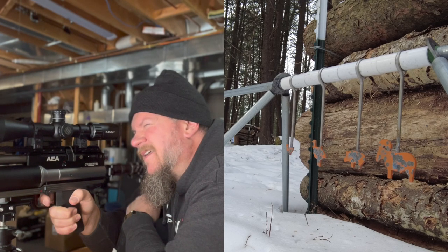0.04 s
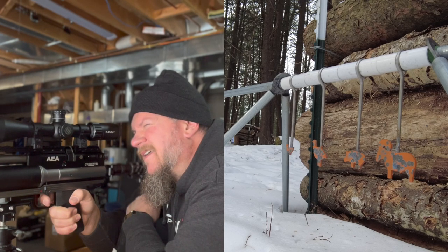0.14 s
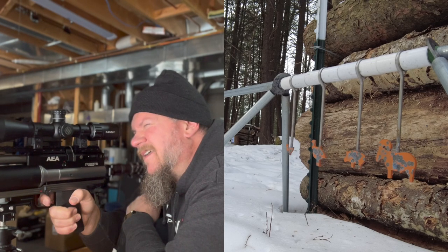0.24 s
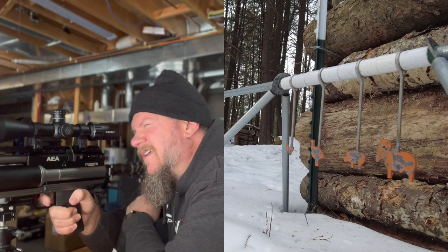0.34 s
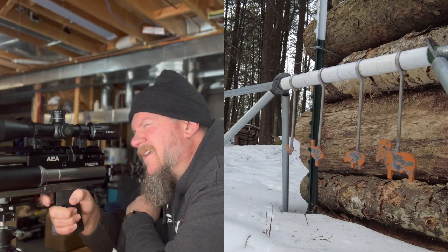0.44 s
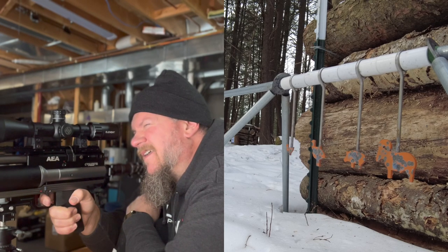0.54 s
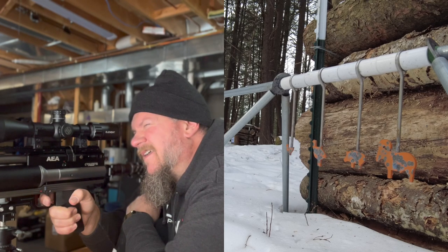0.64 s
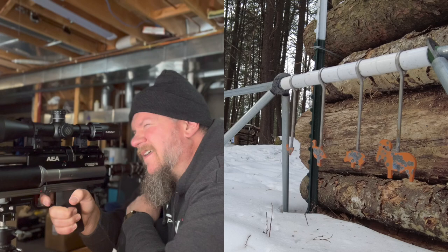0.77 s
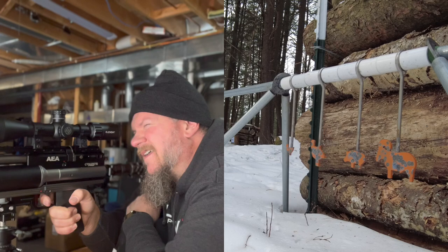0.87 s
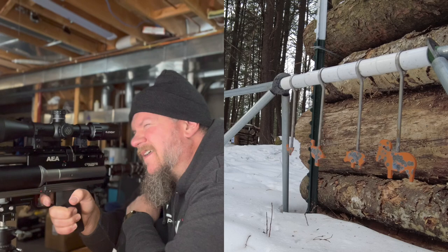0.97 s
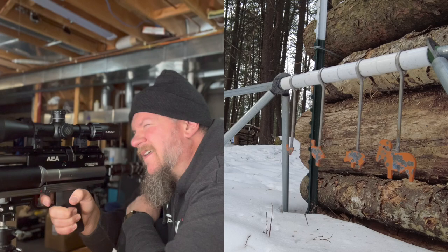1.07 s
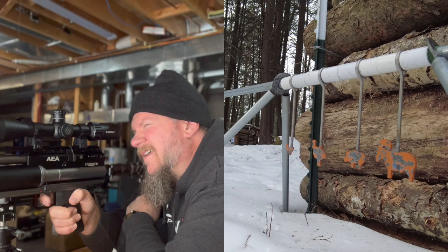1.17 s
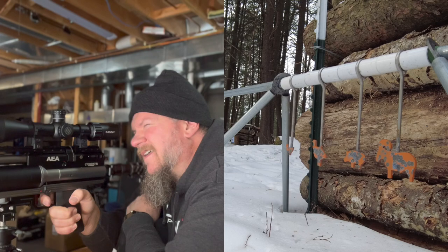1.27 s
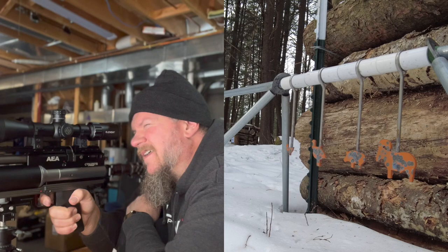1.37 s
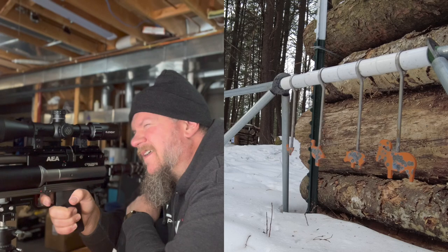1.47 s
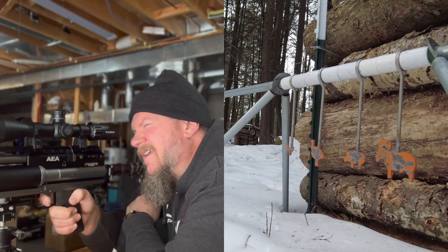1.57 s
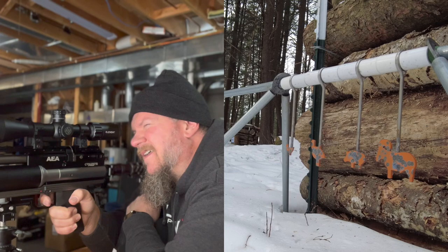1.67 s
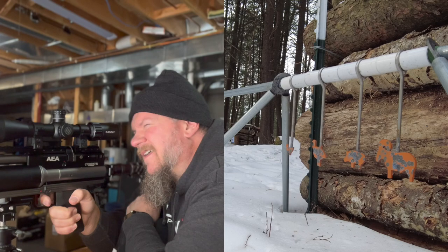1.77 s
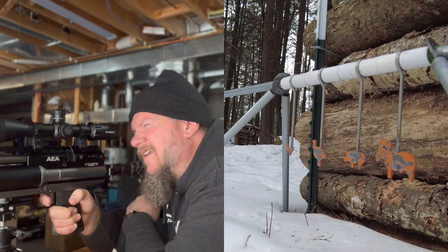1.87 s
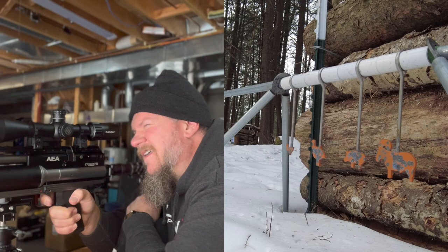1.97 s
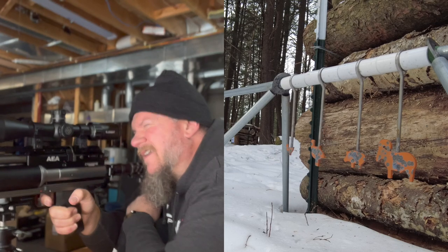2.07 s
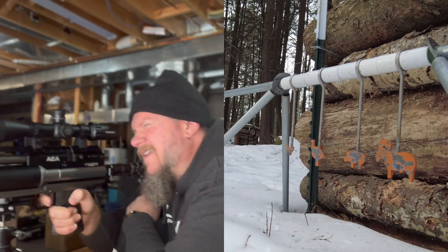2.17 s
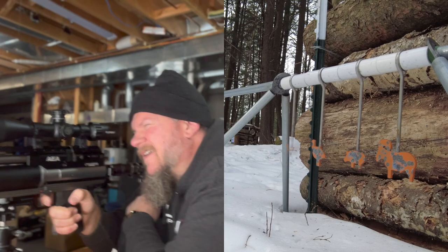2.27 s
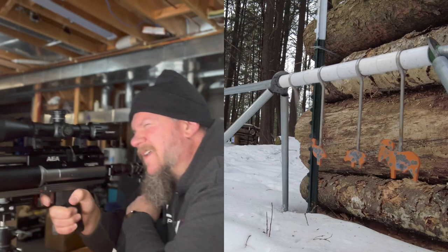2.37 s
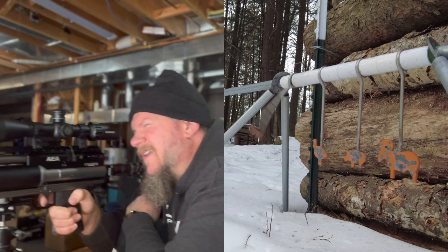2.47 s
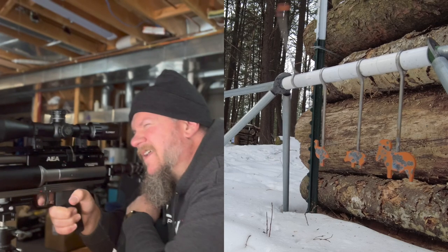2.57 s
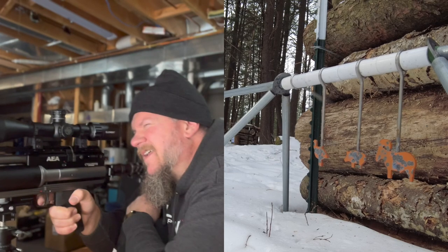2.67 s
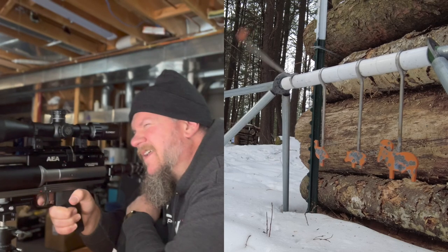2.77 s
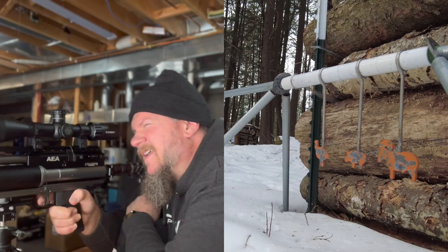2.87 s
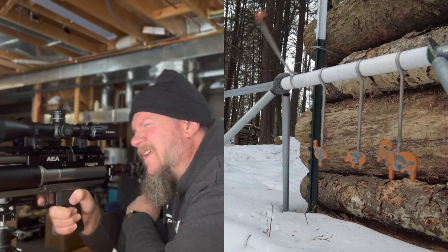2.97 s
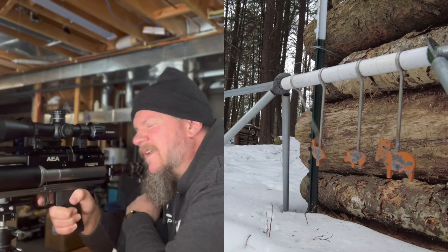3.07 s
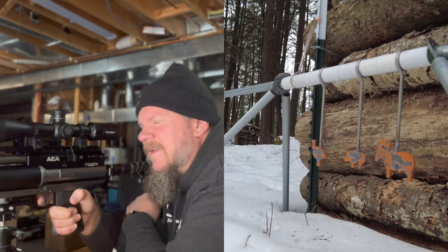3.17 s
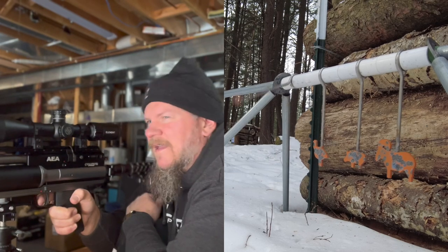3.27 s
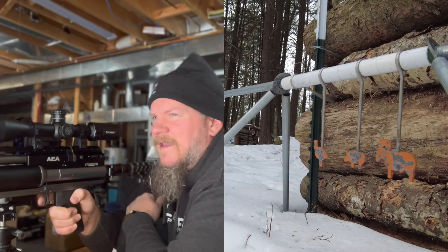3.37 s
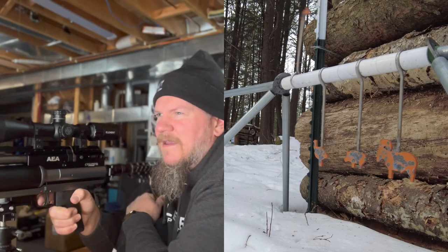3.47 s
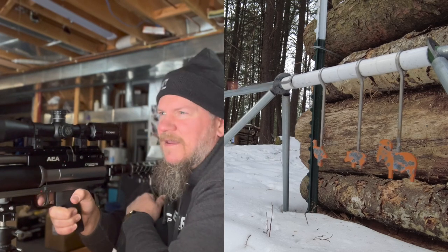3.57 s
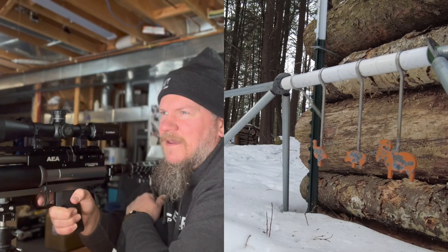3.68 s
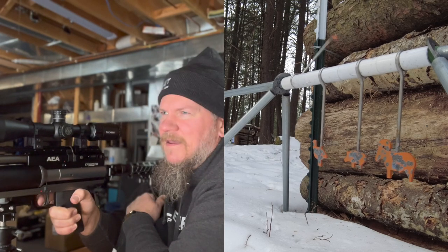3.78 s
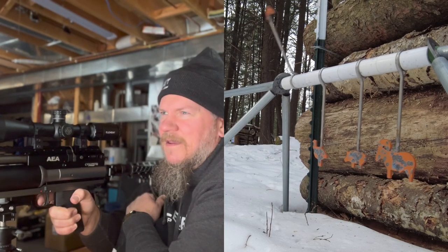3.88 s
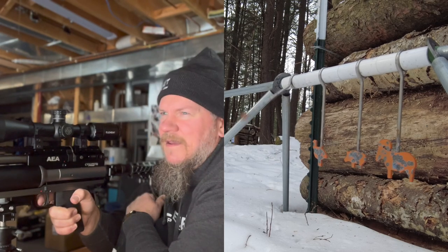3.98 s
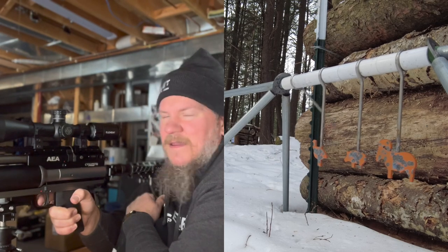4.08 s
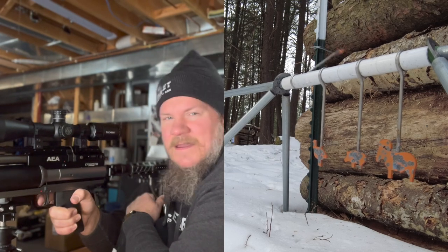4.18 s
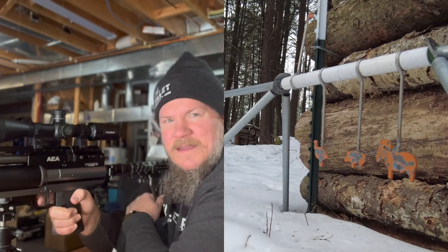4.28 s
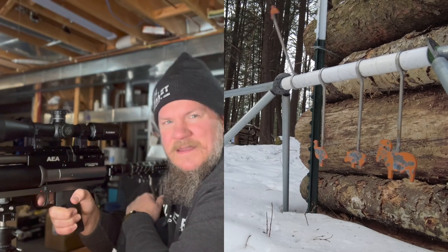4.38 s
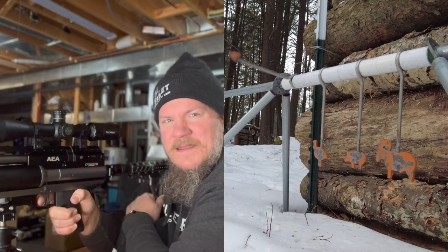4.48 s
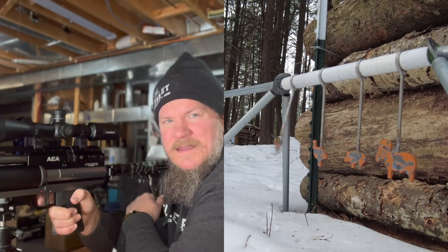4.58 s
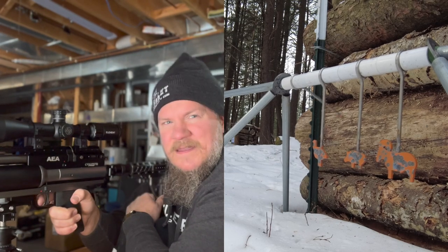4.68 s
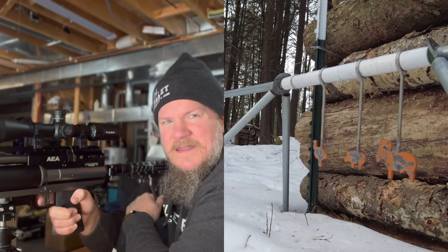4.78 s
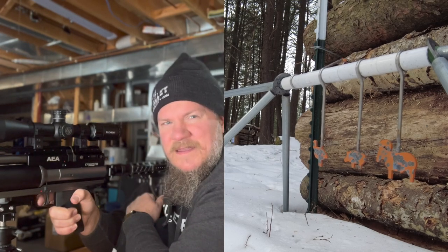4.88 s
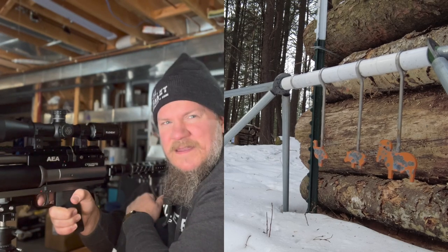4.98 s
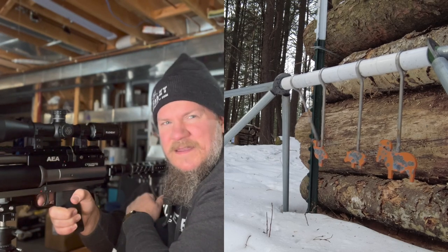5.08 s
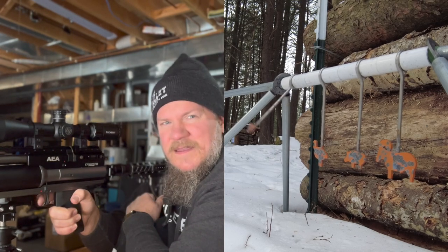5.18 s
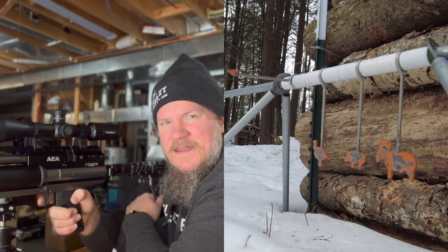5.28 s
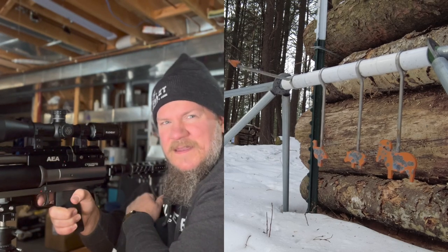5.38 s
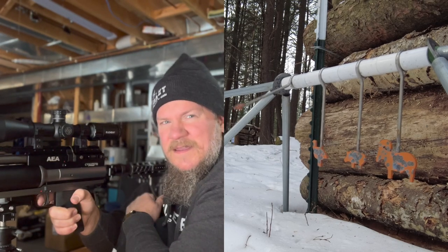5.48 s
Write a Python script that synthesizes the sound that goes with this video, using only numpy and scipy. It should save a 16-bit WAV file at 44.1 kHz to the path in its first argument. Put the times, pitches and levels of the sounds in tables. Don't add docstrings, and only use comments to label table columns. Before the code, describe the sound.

Muffled air rifle shot in a humming basement, quick metallic hit with a late blast, then a spinning steel target grinding and rattling on a pipe.

```python
import sys
import numpy as np
from scipy import signal
from scipy.fft import rfft, irfft, next_fast_len
from scipy.io import wavfile
from scipy.ndimage import uniform_filter1d

SR = 44100
rng = np.random.default_rng(int(sys.argv[2]) if len(sys.argv) > 2 else 0)


def materialize(psi):
    bounded = np.clip(np.atleast_2d(psi).T, -1, 1)
    quanta = np.round(bounded * 32767).astype(np.int16)
    wavfile.write(sys.argv[1], SR, quanta)


def amplitude_ratio(level_db):
    exponent = np.asarray(level_db, float) / 20
    return 10 ** exponent


N = 244347

# freq_hz, density_db_per_hz
ROOM_TONE = [(15, -34), (25, 3), (59, -11), (72, -2), (84, -9.5), (108, -14.5), (185, -27), (212, -32),
             (309, -34.5), (427, -38), (775, -34), (1020, -43), (5280, -58.5), (7920, -56.5), (16000, -80)]
# freq_hz, width_hz, over_room_tone_db
DUCTS = [(54, 79, 2.5), (182.5, 4.8, 8), (458, 140, 11), (2000, 140, 4.5), (2400, 70, 8), (2800, 50, 6.5),
         (3655, 46, 14.5), (4540, 320, 8), (8340, 60, 9), (15500, 1000, 15)]
# freq_hz, likeness (-1 to 1)
ROOM_LIKENESS = [(60, 1), (150, 0.99), (380, 0.72), (950, -0.42), (2380, 0.064), (5980, 0.012),
                 (15000, -0.35)]
# freq_hz, over_rumble_db, waver_hz, throb_db
MOTOR = [(53, 3, .5, 2), (26.5, -5, 1.1, 4.5), (3700, -45.5, 25, 4.5)]
# start_s, peak_db
CLOCK = [
    (0.514, -55.5),
    (0.9438, -57),
    (1.3666, -53.5),
    (1.787, -54.5),
]
# freq_hz, width_hz, level_db
HAMMER = [(506, 530, -33.5), (2100, 180, -40.5), (4500, 700, -45), (7300, 560, -41)]
# start_s, peak_db, decay_ms, lowpass_hz
SHOT = [
    (1.9725, -6.5, 4.5, 13950),
    (1.9758, -4, 4.3, 8940),
    (1.9821, -0.5, 3.5, 14000),
    (1.991, -3, 1.9, 2500),
    (1.997, -15.5, 8.9, 6040),
    (2.047, -18, 4.0, 700),
]
# freq_hz, density_db_per_hz
BLAST = [(35, -38), (60, -11.5), (200, -10.5), (330, -8), (530, -7.5), (1200, -21), (1600, -10.5),
         (2100, -18.5), (5700, -26.5), (6900, -22.5), (9600, -24.5), (16000, -17)]
# start_s, freq_hz, level_db, t60_s, left_minus_right_db
BENCH = [
    (1.9715, 600, -21, .03, 2),
    (1.9748, 630, -9, 0.018, 3),
    (1.9755, 470, -19, 0.04, -4),
    (1.9835, 105, -20, .06, 0),
    (1.983, 770, -27, 0.05, -5),
    (1.9942, 330, -22, .03, 0),
    (2.0, 80, -22.5, 0.1, -1),
    (2.046, 95, -30.5, 0.16, 6),
]
# start_s, freq_hz, level_db, t60_s, left_minus_right_db
BOOM = [
    (1.996, 53.5, -19.5, 0.36, -3.5),
    (2.176, 50, -36, .6, -2),
]
# start_s, freq_hz, level_db, t60_s, left_minus_right_db
ROCKING = [
    (1.9762, 720, -8, .014, 1),
    (1.9855, 160, -11.5, .032, -1),
    (1.9865, 760, -18, .02, 0),
    (1.9885, 54, -24, .16, 0),
]
# freq_hz, t60_s
WORKSHOP_T60 = [(100, 0.43), (600, 0.43), (2000, 0.15), (6000, 0.23), (15000, 0.19)]
# freq_hz, density_db_per_hz
TAIL = [(71, -30), (120, -2), (272, -12.5), (712, -23), (1680, -11.5), (1860, -13.5), (2070, -12),
        (6770, -12.5), (14400, -9), (16000, -18.5)]
# freq_hz, level_db, t60_s
PLATE = [(1758, -28.5, 0.059), (2500, -51, 0.01), (3010, -17, 0.018), (4100, -19, 0.013),
         (4850, -16, 0.014), (6800, -34, 0.0081), (9640, -28.5, .010), (11200, -45, .008)]
# peak_s, level_db, rise_ms, fall_ms, fall_exponent, right_lag_ms
PUSHES = [
    (2.290, -23, 6.0, 4.0, 1.9, 0),
    (2.3381, -6.5, 1.2, 1.1, 1.7, .1),
    (2.3552, -7.5, .05, 2.5, 1.0, .7),
]
# freq_hz, density_db_per_hz
STEEL = [(1470, -34), (2500, -7), (3250, -3.5), (6100, -4.5), (6630, -3), (7990, -4), (9780, -5),
         (11500, -17.5), (14300, -15), (15000, -56.5)]
# freq_hz, width_hz, level_db
STEEL_RINGS = [(3660, 74, -18), (4197, 45, -6.5), (5300, 49, -14.5), (6750, 13, -3.5), (7520, 110, -10.5),
               (8400, 49, -6), (9090, 110, -4), (9830, 200, -8), (10470, 56, -5.5), (11250, 33, -16),
               (11390, 78, -20.5), (12040, 360, -22)]
# freq_hz, density_db_per_hz
PIPE = [(110, -62), (180, -14), (529, 1), (613, -18), (956, -9.5), (1780, -5), (4500, -13.5), (5850, -40),
        (9900, -120)]
# freq_hz, width_hz, level_db
PIPE_RINGS = [(286, 45, -12), (382, 59, -9), (527.5, 37, 0.5), (700, 14, -6), (962, 71, -5.5),
              (1060, 2.8, -3), (1099, 9.5, -3), (1608, 60, -3), (1793, 91, -2), (1856, 45, -12),
              (2220, 120, -5), (2460, 92, -5.5), (2657, 37, -6.5), (2854, 67, -4)]
# peak_s, hiss_db, rise_20db_ms, fall_20db_ms, pipe_relative_db
WHIRL = [(2.285, -30.5, 8.5, 46, -18), (2.328, -36, 7.5, 15, 5.5), (2.34, -26, 1, 11, -15),
         (2.385, -36.5, 36, 300, -12.5), (2.544, -26.5, 262, 284, -12.5), (2.66, -32.5, 202, 90, -5.5),
         (2.73, -29.5, 19, 22, -36), (2.904, -33.5, 403, 104, -2), (3.127, -37.5, 453, 165, 5.5),
         (3.357, -36.5, 219, 173, 0.5), (3.429, -38, 97, 35, 3.5), (3.53, -43.5, 198.5, 297, -1),
         (3.678, -34.5, 98, 102, 0), (3.733, -35, 13, 49, -2.5), (3.772, -41.5, 40, 16, 2),
         (3.82, -48.5, 33.5, 114, -9)]
# peak_s, hiss_db, rise_20db_ms, fall_20db_ms, pipe_relative_db
SWINGS = [(3.905, -43.5, 25, 25, -2.5), (4.0, -74.5, 96, 149.4, 15), (4.116, -38.5, 33.5, 79, 3),
          (4.16, -51, 43, 58, 8.5), (4.194, -51, 4, 30, -20), (4.229, -43, 3, 40.2, -12),
          (4.317, -30, 15, 22.2, -13), (4.342, -48, 5.9, 111, 2), (4.409, -63, 49, 70, 5.5),
          (4.67, -50.5, 4.2, 80.4, 4.5), (4.712, -40.5, 48, 45.3, 3), (4.747, -48.5, 32, 34.8, -0.5),
          (4.798, -58, 20, 60, 2), (5.035, -48, 2.6, 90, 4.5), (5.115, -39.5, 42, 69.4, -2.5),
          (5.181, -36.5, 30, 50, -6.5)]
# start_s, peak_db
CATCHES = [(2.4447, -32), (2.4627, -23), (2.516, -34), (2.5909, -23), (2.662, -23), (3.0139, -43),
           (3.0419, -31), (3.2399, -40), (3.277, -30), (3.5492, -37), (3.5662, -45), (3.5936, -30)]
# start_s, peak_db, pipe_relative_db
KNOCKS = [(2.7254, -25, -28), (2.9001, -35, -15), (3.041, -46, 24.5), (3.5925, -58, -12),
          (3.7255, -22.5, -33), (3.862, -39, 17), (3.8913, -36.5, 14), (4.0844, -41.5, 15.5),
          (4.1945, -36, 11), (4.2296, -35, 10), (4.2425, -35, 12), (4.3138, -32.5, 13), (4.3444, -47, 10),
          (4.6663, -48, 22), (4.7019, -33, -10.5), (4.789, -55.5, 20.5), (5.0336, -41, 13),
          (5.0916, -29.5, -7), (5.1113, -33.5, -19), (5.1644, -34.5, 10), (5.183, -51, 0)]
# start_s, peak_db
RATTLE = [(3.8187, -35.5), (3.848, -37), (3.91, -34.5), (3.955, -41), (3.9815, -53), (4.009, -35.5),
          (4.1107, -38), (4.2574, -46), (4.2803, -44), (4.292, -48), (4.519, -42), (4.6392, -47.5),
          (5.059, -44), (5.171, -36), (5.259, -61)]
LIFTS = [
    3.8915,
    4.3143,
    5.0338,
]
# freq_hz, level_db, t60_s
ROD = [(8520, -16, 0.23), (9350, -14, 0.056), (7400, -20, 0.055), (10000, -34, 0.18), (1780, -10, 0.042),
       (2430, -12.5, 0.034), (1110, -39.5, 0.22), (497, -19.5, 0.58)]
# start_s, freq_hz, level_db, t60_s
PINGS = [
    (4.2594, 6200, -74, .12),
    (4.196, 8600, -77, .4),
    (4.522, 1060, -73, .08),
    (4.851, 1080, -71, 0.11),
    (4.882, 8450, -86, .16),
    (5.25, 1850, -71, 0.082),
]
# start_s, end_s, freq_hz, width_hz, depth (0-1)
HOLLOWS = [(2.303, 2.335, 4250, 4500, 0.3), (2.339, 2.359, 8900, 9000, 0.3), (2.366, 2.395, 3370, 350, .9),
           (2.387, 2.416, 3940, 450, .99), (2.425, 2.467, 3000, 450, .99), (2.462, 2.537, 3950, 500, 0.93),
           (2.467, 2.57, 3060, 200, 0.9), (2.504, 2.538, 3200, 450, .99), (2.568, 2.606, 3100, 450, 0.94),
           (2.585, 2.656, 3170, 251, 1), (2.61, 2.69, 3970, 450, 0.9), (2.697, 2.79, 3440, 252, 1),
           (2.82, 2.88, 4730, 250, .7), (2.92, 2.967, 4750, 300, .9), (3.13, 3.17, 4900, 300, .9),
           (3.29, 3.345, 5050, 300, 1), (4.312, 4.345, 4250, 2500, 0.5), (4.322, 4.356, 5750, 300, .9),
           (4.70, 4.732, 3700, 400, .9)]


def rms_one(x):
    return x / np.sqrt(np.mean(x ** 2) + 1e-20)


def noise(rows=2):
    return rng.standard_normal((rows, N))


def at_hz(points, hz):
    p = np.array(points)
    return np.interp(np.log(hz), np.log(p[:, 0]), p[:, 1])


def colour(x, gain):
    size = next_fast_len(x.shape[-1])
    hz = np.maximum(np.arange(size // 2 + 1) * SR / size, 1)
    return irfft(rfft(x, size) * gain(hz), size)[..., :x.shape[-1]]


def body_colour(x, spectrum):
    size = next_fast_len(N)
    hz = np.maximum(np.arange(size // 2 + 1) * SR / size, 1)
    cepstrum = irfft(np.log(amplitude_ratio(at_hz(spectrum, hz))), size)
    cepstrum[1:size // 2] *= 2
    cepstrum[size // 2 + 1:] = 0
    return irfft(rfft(x, size) * np.exp(rfft(cepstrum)), size)[:, :N]


def ring(x, hz, t60_s):
    r, w = amplitude_ratio(-60 / (t60_s * SR)), 2 * np.pi * hz / SR
    return signal.lfilter([0, np.sin(w)], [1, -2 * r * np.cos(w), r * r], x + 1e-18)


def resonate(x, hz, width_hz):
    r = np.exp(-np.pi * width_hz / SR)
    poles = [1, -2 * r * np.cos(2 * np.pi * hz / SR), r * r]
    return signal.lfilter([(1 - r * r) / 2, 0, (r * r - 1) / 2], poles, x)


def drift(rate_hz):
    r = np.exp(-80 * np.pi * rate_hz / SR)
    slow = signal.lfilter([1], [1, -2 * r, r * r], rng.standard_normal(N // 40 + 2002))[2000:]
    return np.interp(np.arange(N) / 40, np.arange(len(slow)), rms_one(slow))


def after(start_s, decay_s, length=N):
    t = np.arange(length) / SR - start_s
    return (t >= 0) * np.exp(-np.clip(t / decay_s, 0, 40))


def spikes(times_s, sizes):
    out = np.zeros(N)
    out[np.round(np.asarray(times_s) * SR).astype(int)] = sizes
    return out


def bursts(times_s, level_db, decay_s):
    return signal.lfilter([1], [1, -np.exp(-1 / (decay_s * SR))], spikes(times_s, amplitude_ratio(level_db)) + 1e-18)


def background_levels():
    join_s, join_length_s, sag_db_per_s = 2.98, 0.39, 1.5
    # rumble_db, air_db, treble_db, boom_db
    bench_only = np.array([[-43.5], [-59], [5], [-4.5]])
    both_microphones = np.array([[-49.5], [-61], [7], [5.5]])
    t = np.arange(N) / SR
    share = np.clip((t - join_s) / join_length_s, 0, 1)
    levels = bench_only * (1 - share) + both_microphones * share
    levels[0] -= sag_db_per_s * t * (1 - share)
    return levels


def motor_drone():
    drone = np.zeros(N)
    for hz, db, waver_hz, throb_db in MOTOR:
        level = amplitude_ratio(db + throb_db * drift(22))
        phase = 2 * np.pi * np.cumsum(hz + waver_hz * drift(6.9)) / SR
        drone += level * np.sin(phase)
    return drone


def workshop_air():
    def tone(hz):
        humps_db = sum(db / (1 + (2 * (hz - f) / width) ** 2) for f, width, db in DUCTS)
        return amplitude_ratio(at_hz(ROOM_TONE, hz) + humps_db)

    def alike(hz):
        return np.clip(at_hz(ROOM_LIKENESS, hz), -.99, .99)

    white = noise()
    mid = colour(white[0], lambda hz: tone(hz) * np.sqrt(1 + alike(hz)))
    side = colour(white[1], lambda hz: tone(hz) * np.sqrt(1 - alike(hz)))
    both = np.array([mid + side, mid - side])
    low = colour(both, lambda hz: 1 / (1 + (hz / 120) ** 4))
    rumble_db, air_db, treble_db, boom_db = background_levels()
    bass = amplitude_ratio(-6.5) * rms_one(low) + motor_drone()
    bass = bass + amplitude_ratio(-16.5) * rms_one(resonate(side, 50, 30)) * [[1], [-1]]
    air = rms_one(both - low)
    air += (amplitude_ratio(treble_db) - 1) * colour(air, lambda hz: 1 / (1 + (10000 / hz) ** 8))
    air += (amplitude_ratio(boom_db) - 1) * resonate(air, 82, 70)
    return amplitude_ratio(rumble_db) * bass * amplitude_ratio([[-1.2], [1.2]]) + amplitude_ratio(air_db + 6.0) * air


def clock():
    env = np.zeros(N)
    for s, db in CLOCK:
        snap = after(s, 0.0048) + 0.29 * after(s, .03)
        env += amplitude_ratio(db) * (snap + 0.34 * after(s + 0.044, 0.005))
    white = resonate(noise(), 6500, 4200)
    case = resonate(white, 8600, 1800) + 0.93 * resonate(white, 6600, 1500) + 0.87 * resonate(white, 4900, 900)
    return amplitude_ratio(-5.5) * env * rms_one(case)


def hammer_slide():
    t = np.arange(N) / SR
    slide = np.clip((t - 1.946) / 0.027, 0, 1) * (t < 1.974)
    white = noise()
    scrape = 0
    for hz, width_hz, db in HAMMER:
        scrape = scrape + amplitude_ratio(db) * rms_one(resonate(resonate(white, hz, width_hz), hz, width_hz))
    return slide * scrape


def valve_puffs():
    t = np.arange(N) / SR
    air = rms_one(colour(noise(), lambda hz: amplitude_ratio(at_hz(BLAST, hz))))
    air += amplitude_ratio(-4) * noise() * np.exp(np.clip((t - 1.9725) / .002, -40, 0))
    out = np.zeros((2, N))
    for s, db, decay_ms, lowpass_hz in SHOT:
        puff = air * amplitude_ratio(db - 5) * after(s, decay_ms / 1000)
        out += signal.lfilter(*signal.butter(2, lowpass_hz, fs=SR), puff) * amplitude_ratio([[1.5], [-1.5]])
    return out


def bench_modes():
    out = np.zeros((2, N))
    for modes, right_sign in ((BENCH, 1), (BOOM, 1), (ROCKING, -1)):
        for s, hz, db, t60_s, pan_db in modes:
            push = resonate(spikes([s], 1), hz, hz / 2)
            body = ring(push / np.sum(np.abs(push)) * 2, hz, t60_s) * amplitude_ratio(db)
            out += body * amplitude_ratio([[pan_db / 2], [-pan_db / 2]]) * [[1], [right_sign]]
    return out


def workshop_echo():
    start, size = round(1.974 * SR), SR // 2
    far_db, far_t60_s, build_s = -26.5, 1.83, 0.029
    tail = 0
    far = after(0, far_t60_s / np.log(1000), size)
    for low_hz in 62 * 2. ** np.arange(8):
        octave = signal.butter(2, [low_hz, 2 * low_hz], "band", fs=SR, output="sos")
        band = signal.sosfilt(octave, rng.standard_normal((2, size)))
        near = after(0, at_hz(WORKSHOP_T60, 1.6 * low_hz) / np.log(1000), size)
        tail = tail + band * (near + amplitude_ratio(far_db - 5.9 * abs(np.log2(low_hz / 1600))) * far)
    tail = rms_one(colour(tail, lambda hz: amplitude_ratio(at_hz(TAIL, hz))))
    out = np.zeros((2, N))
    out[:, start:start + size] = tail * (1 - np.exp(-np.arange(size) / SR / build_s))
    return amplitude_ratio(-26.5) * out


def rifle():
    return hammer_slide() + valve_puffs() + bench_modes() + workshop_echo()


def target_microphone_top(x):
    return signal.sosfilt(signal.butter(6, 15500, fs=SR, output="sos"), x)


def pellet_strike():
    t = np.arange(N) / SR
    left = spikes([2.2795, 2.2806, 2.2835], [1, -.9, .3])
    right = spikes([2.2796, 2.2809, 2.2838], [.6, -.5, .45])
    hits = np.array([left, right])
    clang = sum(amplitude_ratio(db) * ring(hits, hz, t60_s) for hz, db, t60_s in PLATE)
    spray = resonate(noise(), 5000, 9000) * amplitude_ratio(-8.0) * after(2.2795, 0.00026)
    dust = signal.sosfilt(signal.butter(4, [9000, 15300], "band", fs=SR, output="sos"), noise())
    return target_microphone_top(clang + spray) + amplitude_ratio(-32) * dust * (t > 2.28) * (t < 2.344)


def pressure_pushes():
    rebound_s, rebound_db, rebound_ms = 2.3452, -19.5, 5.5
    t = np.arange(N) / SR
    push = np.zeros((2, N))
    for s, db, rise_ms, fall_ms, fall_exponent, lag_ms in PUSHES:
        for ear in range(2):
            late_ms = (t - s) * 1000 - ear * lag_ms
            rise = (late_ms / (rise_ms + ear * lag_ms)) ** 2
            fall = np.abs(late_ms / fall_ms) ** fall_exponent
            push[ear] -= amplitude_ratio(db) * np.exp(-np.minimum(np.where(late_ms < 0, rise, fall), 40))
    push += amplitude_ratio(rebound_db) * np.exp(-np.minimum(((t - rebound_s) * 1000 / rebound_ms) ** 2, 40))
    return signal.lfilter(*signal.butter(1, 5, "high", fs=SR), push)


def late_blast():
    t = np.arange(N) / SR
    span = (t - 2.33287) / .00006
    crack = 2.4 * (.25 - span) * np.exp(-1.2 * span ** 2)
    splash_env = amplitude_ratio(-12) * after(2.3328, .0004) + amplitude_ratio(-25) * after(2.337, .003) + amplitude_ratio(-25) * after(2.355, .001)
    lead_env = amplitude_ratio(-22) * np.exp(np.clip((t - 2.3327) / .0012, -40, 0)) * (t < 2.3327)
    bright = crack * amplitude_ratio([[-2.0], [2.5]]) + noise() * splash_env + noise() * lead_env
    return target_microphone_top(bright) + pressure_pushes()


def slide_levels():
    rest_hiss_db, rest_pipe_db = -89.5, -73.5
    pipe_follows = 0.87
    ms = np.arange(0, N, 16) / SR * 1000
    hiss, rumble = amplitude_ratio(rest_hiss_db), amplitude_ratio(rest_pipe_db)
    for s, db, rise_ms, fall_ms, pipe_db in [*WHIRL, *SWINGS]:
        late_ms = ms - 1000 * s
        loss_db = np.minimum(20 * np.where(late_ms < 0, -late_ms / rise_ms, late_ms / fall_ms), 150)
        hiss = hiss + amplitude_ratio(db - loss_db)
        rumble = rumble + amplitude_ratio(db + pipe_db - pipe_follows * loss_db)
    silent_db = -60 * (ms < 1000 * WHIRL[0][0] - 3)
    return [np.interp(np.arange(N) / 16, np.arange(len(ms)), 20 * np.log10(x) + silent_db)
            for x in (hiss, rumble)]


def rubbed(spectrum, rings, level, knocks, ring_db, alike, per_s, grit, patchy_db):
    contacts = .5 + (rng.random(N) < per_s / SR) * amplitude_ratio(grit * np.minimum(rng.exponential(1, N), 5))
    white = noise(3)
    white = np.sqrt(alike) * white[0] + np.sqrt(1 - alike) * white[1:]
    drive = np.vstack([white * (rms_one(contacts) * level + knocks), white[0]])
    top_db = max(at_hz(spectrum, hz) - db for hz, width_hz, db in rings)
    body = drive.copy()
    for hz, width_hz, db in rings:
        gain_db = ring_db + db + top_db - at_hz(spectrum, hz) + patchy_db * drift(8.2)
        body += amplitude_ratio(gain_db) * resonate(drive, hz, width_hz)
    body = body_colour(body, spectrum)
    return body[:2] / np.std(body[2])


def scraped_steel(steel_db, slips_db, load_db):
    times_s, peak_db, _ = np.transpose(KNOCKS)
    jolt = bursts(times_s, peak_db - 10.5, 0.003)
    steel = rubbed(STEEL, STEEL_RINGS, amplitude_ratio(steel_db + slips_db), jolt,
                   ring_db=-8.5, alike=0.41, per_s=8800, grit=1.5, patchy_db=4.5)
    sizzle_db = 1.5 + 0.2547 * load_db
    return steel + (amplitude_ratio(sizzle_db) - 1) * resonate(steel, 12400, 4000)


def growling_pipe(pipe_db, slips_db, load_db):
    linger_s, catch_db, catch_s = 0.0031, -8, 0.018
    times_s, peak_db, low_db = np.transpose(KNOCKS)
    rattle_s, rattle_db = np.transpose(RATTLE)
    catches_s, catches_db = np.transpose(CATCHES)
    thud = bursts(times_s, peak_db + low_db - 11, 0.0022) + bursts(rattle_s, rattle_db - 4, .003)
    keep = np.exp(-1 / (linger_s * SR))
    rub = amplitude_ratio(pipe_db) + bursts(catches_s, catches_db + catch_db, catch_s)
    growl = signal.lfilter([1 - keep], [1, -keep], rub) * amplitude_ratio(0.5 * slips_db + 0.73 * drift(28))
    pipe = rubbed(PIPE, PIPE_RINGS, growl, thud,
                  ring_db=0.5, alike=1.0, per_s=600, grit=2.3, patchy_db=3.0)
    boom_db = -3 - 0.4154 * load_db
    pipe += (amplitude_ratio(boom_db) - 1) * resonate(pipe, 330, 450)
    shudder = rms_one(resonate(rng.standard_normal(N), 111, 52))
    return pipe + amplitude_ratio(-44.5) * (after(2.42, 0.22) - after(2.42, 0.057)) * shudder


def ringing_rod():
    times_s, peak_db, _ = np.transpose(KNOCKS)
    rod = np.zeros(N)
    for hz, db, t60_s in ROD:
        strength_db = rng.normal(0, 4.0, len(times_s))
        rod += ring(spikes(times_s, amplitude_ratio(peak_db + db + strength_db)), hz, t60_s)
    for s, hz, db, t60_s in PINGS:
        rod += ring(resonate(spikes([s], amplitude_ratio(db + 21)), hz, 120), hz, t60_s)
    return rod


def blotches(x, patchy_db, rate_hz):
    for hz in np.geomspace(1100, 9000, 9):
        x = x + (amplitude_ratio(patchy_db * drift(rate_hz)) - 1) * resonate(x, hz, hz / 4)
    return x


def band_hollows(x):
    x = x.copy()
    for start_s, end_s, hz, width_hz, depth in HOLLOWS:
        part = slice(round(start_s * SR) - 400, round(end_s * SR))
        t = np.arange(part.start, part.stop) / SR
        gate = min(depth, 1) * np.clip(np.minimum(t - start_s, end_s - t) / .006, 0, 1)
        for _ in range(3):
            x[:, part] -= gate * resonate(x[:, part], hz, width_hz)
    return x


def hanger():
    mean_hiss_db = -49.5
    steel_db, pipe_db = slide_levels()
    t = np.arange(N) / SR
    afloat = sum(np.clip((t - s + .03) / .015, 0, 1) * (t < s) for s in LIFTS)
    slips_db = 0.82 * drift(22) + 1.2 * drift(90) - 14 * afloat
    load_db = np.clip(uniform_filter1d(steel_db - mean_hiss_db, size=4000), -20, 20)
    steel = scraped_steel(steel_db, slips_db, load_db)
    pipe = growling_pipe(pipe_db, slips_db, load_db)
    frame = (steel + ringing_rod()) * amplitude_ratio([[-1.6], [1.6]]) + pipe
    out = band_hollows(blotches(frame, patchy_db=1.35, rate_hz=15.0))
    return np.array([np.roll(out[0], 5), out[1]])


def scene():
    return workshop_air() + clock() + rifle() + pellet_strike() + late_blast() + hanger()


def low_pass(x):
    return signal.sosfilt(signal.butter(12, 17000, fs=SR, output="sos"), x)


def record(dry):
    rounded = np.tanh(dry / 1.136)
    mix = signal.sosfilt(signal.cheby2(16, 55, 16700, fs=SR, output="sos"), rounded)
    return low_pass(mix)


dry = scene()
out = record(dry)
materialize(out)
```